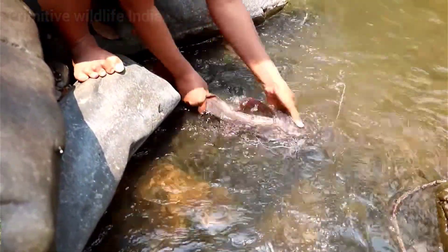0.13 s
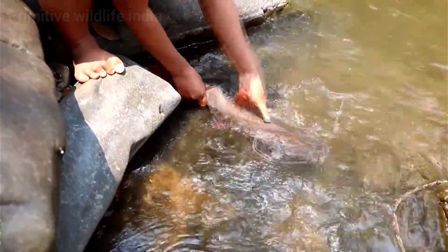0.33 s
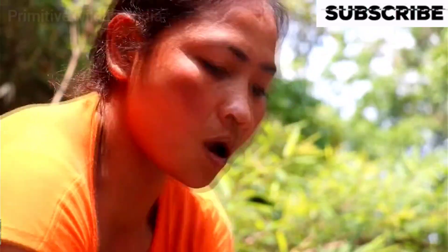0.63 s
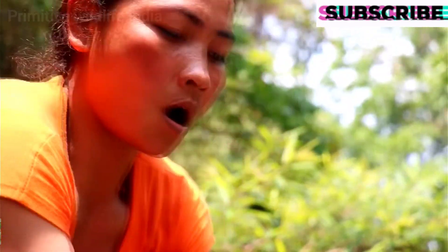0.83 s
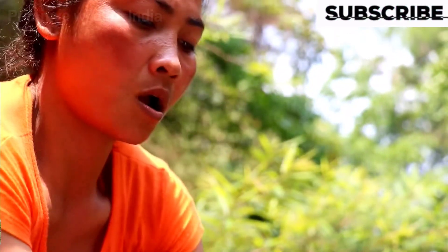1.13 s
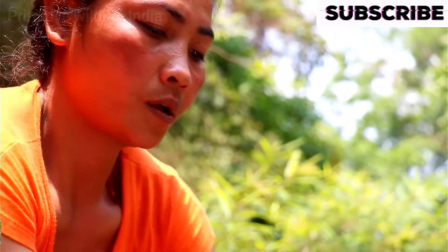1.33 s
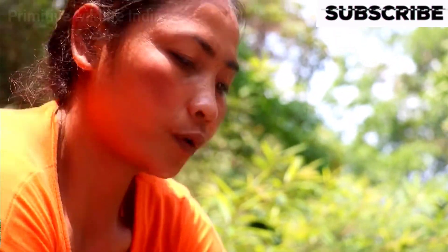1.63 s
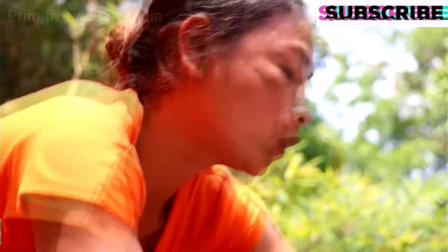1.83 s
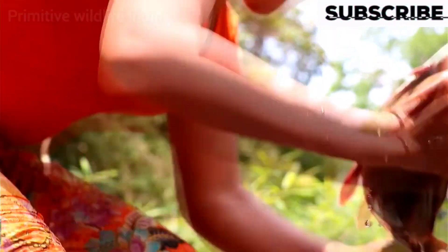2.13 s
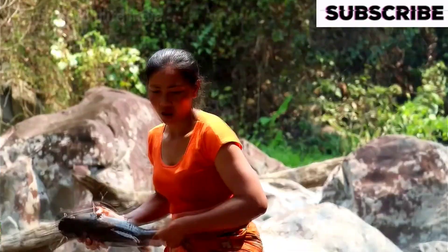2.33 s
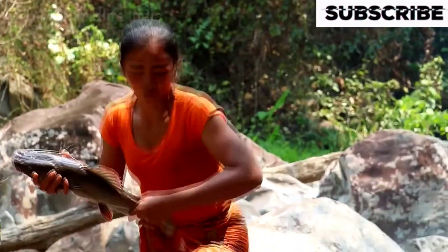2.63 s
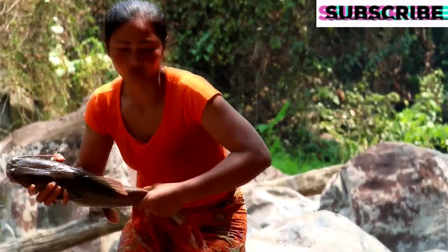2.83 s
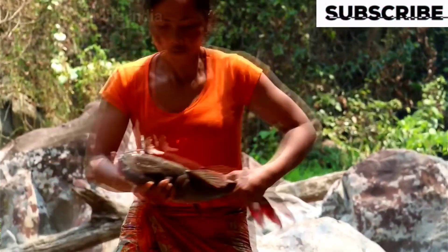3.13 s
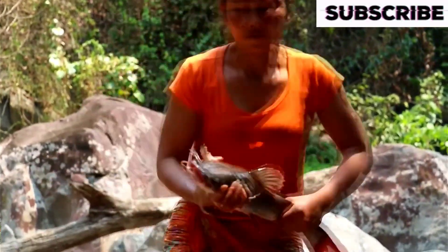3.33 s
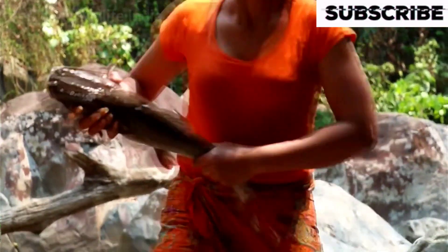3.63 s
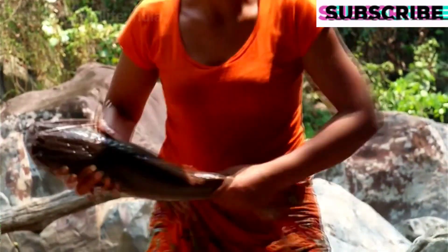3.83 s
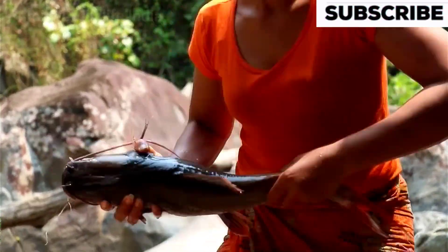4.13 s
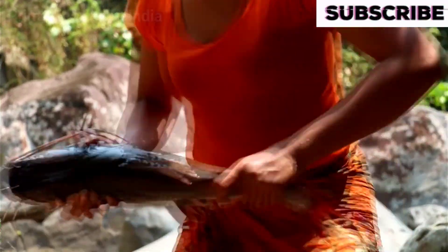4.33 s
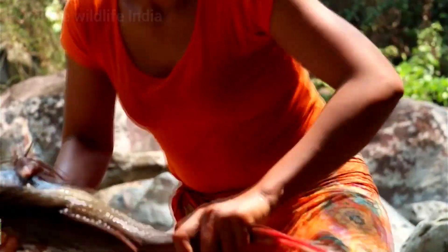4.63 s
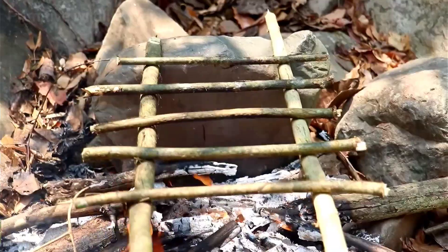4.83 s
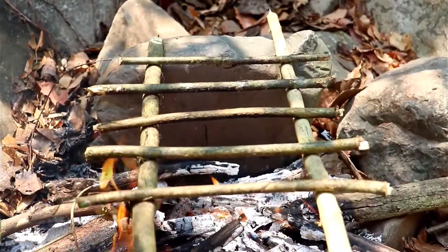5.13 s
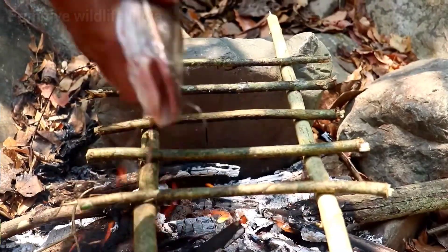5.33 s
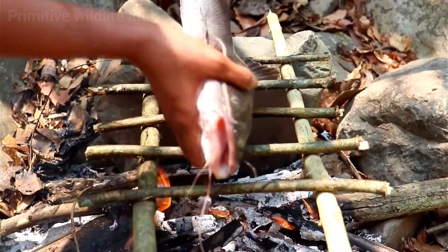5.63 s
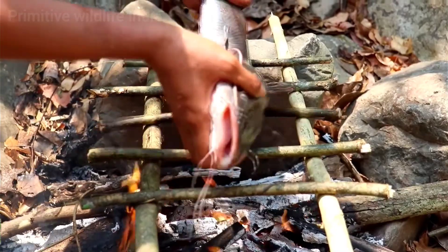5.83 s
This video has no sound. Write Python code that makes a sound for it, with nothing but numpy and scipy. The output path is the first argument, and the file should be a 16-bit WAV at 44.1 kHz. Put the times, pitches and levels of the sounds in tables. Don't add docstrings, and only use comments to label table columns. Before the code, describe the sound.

From 0 to 0.5 s, close shallow river water gurgles around hands rinsing a fish: low round bubbles, small high pings and a soft wash, swelling at the end. At 0.5 s it cuts abruptly to the water's edge, heard through a small, thin microphone ringing near 3 kHz. A grainy rush carries crowded sharp splashes, drips and spatters, with the loudest bursts near 1.0, 1.15 and 1.25 to 1.32 s, easing into small dull spatters by 2 s. From 2.1 s the rush is weaker, smoother and steady, with gentle swells. A knock comes at 2.7 s, a dry stone blow at 3.03 s briefly dips the water, and light knocks and rustles follow. After 4.55 s a similar thin hiss continues, swelling brightly around 5 s, with faint drips, a few ticks and soft rustles. Distant bird whistles and insect calls remain faint throughout.

```python
import sys
import numpy as np
from scipy import signal
from scipy.io import wavfile
from scipy.ndimage import uniform_filter1d

SR = 44100
rng = np.random.default_rng(int(sys.argv[2]) if len(sys.argv) > 2 else 0)


def amplitude_ratio(level_db):
    exponent = np.asarray(level_db, float) / 20
    return 10 ** exponent


def output_pcm(signal):
    pcm = np.clip(np.atleast_2d(signal).T, -1, 1) * 32767
    wavfile.write(sys.argv[1], SR, np.round(pcm).astype(np.int16))


N = 263277

# start_s, end_s
SHOTS = [
    (0, .479),
    (.502, 2.0635),
    (2.097, 4.506),
    (4.552, 6),
]

# frequency_hz, density_db
FOREST_COLOUR = [(20, 10.5), (45, 1), (90, -8), (200, -4.5), (400, -5), (1300, -0.5), (5000, -2.5),
                 (8500, -6), (11000, -22), (13000, -45)]
# start_s, length_s, from_hz, to_hz, level_db
BIRDS = [(0.052, 0.054, 4360, 5000, -40.5), (0.398, 0.19, 7340, 7240, -51), (1.998, 0.18, 8000, 8250, -57),
         (2.3, 0.2, 3550, 3600, -41), (3.036, 0.28, 4600, 4630, -47), (3.44, 0.18, 1297, 1190, -55),
         (4.88, .2, 4390, 4200, -40), (5.242, .06, 7200, 7060, -48), (5.395, .04, 6500, 7400, -46),
         (5.42, .22, 7500, 7400, -47), (5.7, 0.089, 7770, 7800, -42.5)]
# start_s, length_s,
# from_hz, to_hz, level_db
BLURRED_CALLS = [
    (0.19, 0.24, 7600, 4200, -38),
    (2.25, 0.26, 2850, 3336, -31.5),
    (4.87, .14, 2800, 2900, -34),
    (5.02, .16, 2950, 3200, -35),
    (4.88, .33, 6100, 5800, -45),
    (5.77, .08, 3200, 3600, -37.5),
    (5.761, 0.23, 4150, 3700, -42),
]

# time_s, level_db
RUSH = [(0.503, -26), (0.7, -28), (0.95, -31), (1.2, -29), (1.4, -29), (1.78, -34), (1.88, -33),
        (2.063, -31), (2.098, -36.5), (2.75, -36), (3.05, -37.5), (3.6, -36), (4.0, -36.5), (4.5, -36.5),
        (4.553, -39), (4.75, -35.5), (5.3, -37), (5.97, -36.5)]
# middle_s, half_width_s, rise_db, extra_treble_db_per_octave
SURGES = [
    (2.38, 0.068, 2, -1),
    (2.53, 0.074, 2.5, -2),
    (3.2, 0.041, 3.5, -0.5),
    (3.5, 0.044, 2.5, 0.7),
    (3.92, 0.1, 5.5, 1.5),
    (4.34, 0.035, 3.5, 0.5),
    (4.94, 0.067, 4.5, 2.1),
    (5.1, 0.13, 5, 1),
]
# frequency_hz, gain_db
SMALL_MIC = [(840, -30.5), (1400, -19.5), (1750, -12.5), (2000, -13), (2600, -3.5), (3080, 2), (3450, -3.5),
             (3850, -8.5), (4500, -10.5), (5300, -15), (6200, -15.5), (8200, -23.5), (9600, -20.5),
             (12500, -35.5)]

# time_s, level_db, brightness_db_per_octave
CLOSE = [
    (0.0, -31.5, 6.5),
    (0.132, -27.5, 2),
    (0.29, -30, 5.5),
    (0.478, -24, 4.5),
]
# frequency_hz, density_db
CLOSE_COLOUR = [(24, -53), (40, -47), (243, -6), (320, -20), (455, -1.5), (585, -9), (873, -4.5),
                (2570, -11), (3060, -6), (3560, -3.5), (5720, -20.5), (9690, -23.5), (16000, -40)]
# start_s, peak_db, pitch_hz, t60_s
GURGLES = [(0.038, -14, 464, 0.055), (0.062, -13, 690, 0.036), (0.094, -22, 827, 0.062),
           (0.131, -16.5, 885, 0.046), (0.147, -21.5, 860, 0.064), (0.205, -30, 440, 0.06),
           (0.11, -23, 1300, 0.03), (0.19, -24, 1450, 0.03), (0.251, -24.5, 1335, 0.081),
           (0.272, -21, 800, 0.03), (0.32, -24, 453, 0.13), (0.342, -18.5, 840, 0.064),
           (0.363, -15.5, 660, 0.046), (0.38, -22, 455, 0.089), (0.405, -24, 937, 0.039),
           (0.425, -13.5, 1110, 0.024), (0.444, -14.5, 369, 0.075)]
# start_s, peak_db, pitch_hz
PINGS = [
    (0.105, -28, 3600),
    (0.1595, -23, 4230),
    (0.19, -27, 4860),
    (0.2038, -22, 4600),
    (0.2563, -20, 4650),
    (0.288, -20, 2620),
    (0.302, -23, 4150),
    (0.343, -22.5, 2900),
    (0.45, -26, 4000),
]

# start_s, peak_db, treble_db, bass_db
SPLASHES = [(0.516, -12, -43, -21), (0.5643, -9.5, -17.5, -26), (0.605, -17, -18, -9),
            (0.651, -18, -25, -21), (0.676, -15.5, -14, -7), (0.756, -14, -28, -14.5),
            (0.839, -16, -37, -31), (0.875, -9.5, -33, -27), (0.9349, -8.5, -30, -41),
            (0.9764, -1, -21, -30), (1.0305, -14, -28, -33), (1.067, -18, -31, -15),
            (1.114, -15.5, -31, -18), (1.1562, -5.5, -16.5, -16.5), (1.2127, -12, -27, -27),
            (1.2417, -0.6, -21, -32), (1.289, -15, -19, -28), (1.301, -13, -1.5, -23),
            (1.3198, -4.5, -8, -28), (1.357, -10, -23, -39), (1.4383, -5, -20, -20),
            (1.4689, -13.5, -26, -25), (1.5086, -15, -25, -35), (1.522, -9.5, -20, -25),
            (1.541, -9, -28.5, -26), (1.6254, -18.5, -21, -11), (1.6796, -17, -27, -27),
            (1.8235, -29, -1, -34), (2.0565, -17, -24, -22)]
# start_s, peak_db
SPATTERS = [(0.5077, -22), (0.7717, -29), (1.1812, -18), (1.374, -21), (1.425, -19), (1.4942, -18),
            (1.582, -22.5), (1.709, -21), (1.86, -20.5), (1.934, -18), (1.949, -18), (1.978, -19.5),
            (1.989, -17.5), (2.0177, -22), (2.0385, -17.5)]
# start_s, peak_db, treble_db, t60_s
KNOCKS = [(2.3782, -36, -52, 0.035), (2.711, -15, -29, 0.074), (2.9665, -24.5, -24, 0.032),
          (3.0026, -16.5, -24, 0.045), (3.0324, -22, -28, 0.03), (3.086, -32, -4, 0.02),
          (3.197, -26, -25, 0.042), (3.3045, -27, -22, 0.018), (3.378, -28, -23, 0.029),
          (3.411, -29, -19, 0.034), (3.7637, -21, -41, 0.029), (3.7885, -23, -12, 0.052),
          (3.8714, -26, -7, 0.025), (4.038, -18.5, -19, 0.032), (4.4024, -23, -28, 0.061),
          (4.4333, -24, -22, 0.035), (4.806, -22.5, -28, 0.035), (5.524, -25.5, -24, 0.039),
          (5.766, -26, -24, 0.032)]
# start_s, peak_db, pitch_hz
DRIPS = [(.521, -27, 1490), (0.553, -31.5, 603), (.565, -29, 1520), (0.681, -45, 1600),
         (0.732, -29.5, 1670), (.828, -32.5, 1200), (.905, -38, 1100), (0.959, -40, 910), (.976, -23, 1830),
         (1.035, -27, 1800), (1.069, -33, 708), (1.124, -28, 1790), (1.192, -38, 940), (1.451, -34, 750),
         (1.485, -29, 1760), (1.633, -30, 1610), (1.661, -37, 1360), (2.005, -44, 790), (4.712, -38, 1780),
         (4.762, -41, 1750), (5.21, -38, 1900), (5.397, -39, 1790), (5.43, -37.5, 1750), (3.415, -48, 745),
         (3.428, -30, 5150), (3.419, -29, 3800)]
# start_s, peak_db, pitch_hz, t60_s, rise_octaves_per_s
CHIRPS = [
    (.572, -33, 695, 0.05, 35),
    (3.048, -27, 960, 0.015, 20),
    (.886, -39.5, 445, 0.096, 30),
    (1.323, -38.5, 353, 0.15, 56),
    (1.329, -23.5, 1230, 0.027, 60),
    (1.452, -30, 1106, 0.15, 62),
    (1.935, -40, 698, 0.33, 25),
    (2.05, -32.5, 1360, 0.06, 45),
]
# start_s, length_s, level_db, brightness_db_per_octave
RUSTLES = [
    (2.706, 0.03, -28, 3.5),
    (3.413, .04, -33, -4.5),
    (3.781, 0.047, -37, 6.5),
    (3.876, 0.084, -38.5, 6),
    (4.03, 0.072, -36, 2),
    (4.194, 0.014, -35, 8.5),
    (5.082, 0.047, -40, 5.5),
    (5.443, 0.18, -49, 10),
    (5.775, 0.078, -43, -2),
]
# start_s, peak_db, pitch_hz
THUMP = (3.0345, -14, 1000)

BOTTOM, TOP = (107, -56.5), (20000, -41.5)
FOREST_DB = -53
CALL_ENDS_DB = -9.5
BIRD_BLUR_HZ, WIDE_BLUR_HZ = 260, 470
EDGE_TILT, FAR_TILT = (1.7, 5.15), (2.48, 0.73)  # treble, bass in dB per octave at the usual level
EDGE_USUAL_DB, FAR_USUAL_DB = -29.5, -35.5
TREBLE_PER_DB, BASS_PER_SURGE_DB = -0.56, -2
GURGLE_RISE, PING_RISE, DRIP_RISE = 0.23, 0.099, 0.22
PING_T60_S, DRIP_T60_S, SPLASH_T60_S = 0.015, 0.063, 0.029
SPATTER_TREBLE_DB, SPATTER_BASS_DB, KNOCK_BASS_DB = -37, -28, -21
HARD_DB = -12
RING_HZ, RING_HZ_PER_DB, RING_SCATTER_HZ = 2916, 40.5, 126
SNAP_PER_DB, SHORTER_S_PER_DB = 0.23, 0.0008


def evened(x):
    return x / np.sqrt(np.mean(x ** 2) + 1e-20)


def read(points, hz):
    f, value = np.transpose(points)
    return np.interp(np.log(hz + 1), np.log(f + 1), value)


def curve(rows):
    s, *columns = np.transpose(rows)
    return [np.interp(np.arange(N) / SR, s, c) for c in columns]


def add(mix, s, sound):
    part = mix[round(s * SR):][:len(sound)]
    part += sound[:len(part)]


def causal(points, size=2048):
    gain_db = read(points, abs(np.fft.fftfreq(size, 1 / SR)))
    log_gain = np.log(amplitude_ratio(np.maximum(gain_db, -100)))
    spectrum = np.exp(np.conj(signal.hilbert(log_gain)))
    taps = np.fft.ifft(spectrum).real[:size // 2]
    return taps / np.linalg.norm(taps)


def hiss(colour, treble_db, bass_db, patchy_db, flicker_db, size=512):
    hop = size // 4
    frames, hz = N // hop + 5, np.fft.rfftfreq(size, 1 / SR)
    a, b, patches = rng.standard_normal((frames, len(hz), 3)).T
    patches = uniform_filter1d(patches, size=5, axis=0)
    patches = evened(uniform_filter1d(patches, size=6, axis=1))
    flicker = evened(uniform_filter1d(rng.standard_normal(frames), size=3))
    octaves = np.log2((hz + 200) / 3200)[:, None]
    at = np.minimum(np.arange(frames) * hop, N - 1)
    tilt = np.clip(octaves, 0, 1.6) * treble_db[at] + np.maximum(-octaves, 0) * bass_db[at]
    field_db = read(colour, hz)[:, None] + tilt + patchy_db[at] * patches + flicker_db * flicker
    field = (a + 1j * b) * amplitude_ratio(field_db)
    noise = signal.istft(field, nperseg=size, noverlap=size - hop)[1][:N]
    return noise / np.sqrt(np.median(uniform_filter1d(noise ** 2, size=2000)))


def bubble(hz, t60, rise):
    t = np.arange(0, abs(t60) + .002, 1 / SR)
    pitch_hz = np.minimum(hz * 2 ** (rise * t / t60), SR / 3)
    turns = np.cumsum(pitch_hz) / SR
    onset = 1 - np.exp(-t * hz / 0.28)
    return np.sin(2 * np.pi * turns) * amplitude_ratio(-60 * t / t60) * onset


def fizz(lo_hz, hi_hz, per_s, spread_db, cycles, count=24):
    strength = amplitude_ratio(spread_db * np.minimum(rng.exponential(1, N), 3.6))
    strength = strength * (rng.random(N) < per_s / SR)
    kind = rng.integers(0, count, N)
    shapes = [bubble(f, cycles / f, 0.46) for f in np.geomspace(lo_hz, hi_hz, count)]
    out = np.zeros(N)
    for at in np.flatnonzero(strength):
        add(out, at / SR, strength[at] * shapes[kind[at]])
    return out


def call(length, from_hz, to_hz, db, blur_hz):
    u = np.arange(0, length, 1 / SR) / length
    r = np.exp(-2 * np.pi * (blur_hz + 0.1 * abs(to_hz - from_hz)) / SR)
    noise = rng.standard_normal((20000, 2)) @ [1, 1j]
    smear = signal.lfilter([1], np.poly([r, r, r, r]), noise)
    smear = smear[2000:][:len(u)]
    turns = np.cumsum(from_hz + (to_hz - from_hz) * u) / SR
    tone = (smear * np.exp(2j * np.pi * turns)).real
    arch = amplitude_ratio(db + CALL_ENDS_DB * (2 * u - 1) ** 2)
    return arch * evened(tone) * signal.windows.tukey(len(u), .25)


def forest():
    flat = np.zeros(N)
    air = hiss(FOREST_COLOUR, flat, flat, patchy_db=flat + 1.1, flicker_db=-2.0, size=2048)
    out = amplitude_ratio(FOREST_DB) * air
    for calls, blur_hz in [(BIRDS, BIRD_BLUR_HZ), (BLURRED_CALLS, WIDE_BLUR_HZ)]:
        for s, *row in calls:
            add(out, s, call(*row, blur_hz))
    return out


def trickle():
    return amplitude_ratio(-57.5) * evened(fizz(620, 2200, 110, 2.6, 28.0))


def rush():
    t = np.arange(N) / SR
    edge = t < SHOTS[1][1]
    surge_db, spray_db = sum(np.c_[tilts] * np.exp(-((t - s) / half) ** 2) for s, half, *tilts in SURGES)
    level_db = curve(RUSH)[0] + surge_db
    treble_db, bass_db = np.where(edge, np.c_[[*EDGE_TILT]], np.c_[[*FAR_TILT]])
    excess_db = level_db - np.where(edge, EDGE_USUAL_DB, FAR_USUAL_DB)
    treble_db = treble_db + spray_db + TREBLE_PER_DB * excess_db
    bass_db = bass_db + BASS_PER_SURGE_DB * surge_db
    crowd = signal.lfilter([1, -.9], [1], fizz(712, 8720, 700, 3.8, 19.))
    grains = signal.oaconvolve(crowd, causal(SMALL_MIC + [TOP]))[:N]
    share = np.where(edge, amplitude_ratio(.5), amplitude_ratio(-11))
    patchy_db = np.where(edge, 3, 1.3)
    wash = hiss([BOTTOM] + SMALL_MIC + [TOP], treble_db, bass_db, patchy_db, flicker_db=.7)
    return amplitude_ratio(level_db) * (wash + share * evened(grains)) / np.sqrt(1 + share ** 2)


def close_water():
    level_db, bright_db = curve(CLOSE)
    wash = hiss(CLOSE_COLOUR, bright_db, bright_db, patchy_db=np.full(N, 3.5), flicker_db=2.0)
    coarse_fizz = evened(fizz(650, 2300, 350, 3.2, 15.))
    fine_fizz = evened(fizz(1830, 10900, 500, 2.6, 27.0))
    out = amplitude_ratio(level_db) * (amplitude_ratio(-6) * wash + amplitude_ratio(-5) * coarse_fizz + amplitude_ratio(-14) * fine_fizz)
    for s, db, hz, t60 in GURGLES:
        add(out, s, amplitude_ratio(db) * bubble(hz, t60, GURGLE_RISE))
    for s, db, hz in PINGS:
        add(out, s, amplitude_ratio(db) * bubble(hz, PING_T60_S, PING_RISE))
    return out


def rustle(length, bright_db):
    count = round(length * SR)
    noise, grip = rng.standard_normal((9000, 2)).T
    crackle = noise * amplitude_ratio(1.9 * evened(uniform_filter1d(grip, size=40)))
    envelope = signal.windows.tukey(count, .4) * np.linspace(1, .45, count)
    colour = [(f, db + bright_db * max(np.log2(f / 3000), 0)) for f, db in SMALL_MIC + [TOP]]
    return evened(signal.oaconvolve(crackle[:count] * envelope, causal(colour, size=512)))


def thump(hz):
    out = np.zeros(4000)
    add(out, 0, 0.99 * bubble(hz, 0.0078, -.3))
    add(out, 0, -0.96 * bubble(2.02 * hz, 0.005, -.1))
    add(out, 0, 1.5 * bubble(3140, 0.0053, -0.12))
    add(out, 0, 0.23 * bubble(1.28 * hz, 0.029, 0.06))
    return out


def ring_hz(db):
    scatter_hz = RING_SCATTER_HZ * rng.uniform(-0.37, 1)
    return RING_HZ + RING_HZ_PER_DB * max(db - HARD_DB, 0) + scatter_hz


def splash(treble_db, bass_db, t60, hz, snap):
    t = np.arange(2600) / SR
    noise, clumps = rng.standard_normal((len(t), 2)).T
    clumps = amplitude_ratio(3 * evened(uniform_filter1d(clumps, size=60)))
    packet = snap * np.exp(-t / 0.00026) * (np.sin(2 * np.pi * hz * t) + .5 * noise)
    droplets = noise * clumps * amplitude_ratio(-60 * t / t60)
    drive = (packet + droplets) * (1 - np.exp(-t / 0.0007))
    colour = [(500, bass_db - 25.0), (1200, bass_db - 12), (1900, bass_db),
              (0.84 * hz, -16), (hz, 0), (1.114 * hz, -16),
              (5800, treble_db), (9000, treble_db - 16.5), (16000, treble_db - 23.5)]
    sound = signal.oaconvolve(drive, causal(colour, size=1024))
    return sound / abs(sound).max()


def hands():
    out = np.zeros(N)
    small = [(s, db, SPATTER_TREBLE_DB, SPATTER_BASS_DB) for s, db in SPATTERS]
    for s, db, treble_db, bass_db in SPLASHES + small:
        hard_db = max(db - HARD_DB, 0)
        t60 = SPLASH_T60_S - SHORTER_S_PER_DB * hard_db
        snap = 0.5 + SNAP_PER_DB * hard_db
        add(out, s, amplitude_ratio(db) * splash(treble_db, bass_db, t60, ring_hz(db), snap))
    for s, db, treble_db, t60 in KNOCKS:
        add(out, s, amplitude_ratio(db) * splash(treble_db, KNOCK_BASS_DB, t60, ring_hz(db), snap=0.49))
    for s, db, hz in DRIPS:
        add(out, s, amplitude_ratio(db) * bubble(hz, DRIP_T60_S, DRIP_RISE))
    for s, db, hz, t60, octaves_per_s in CHIRPS:
        add(out, s, amplitude_ratio(db) * bubble(hz, t60, octaves_per_s * t60))
    for s, length, db, bright_db in RUSTLES:
        add(out, s, amplitude_ratio(db) * rustle(length, bright_db))
    s, db, hz = THUMP
    add(out, s, amplitude_ratio(db) * thump(hz))
    no_bass = signal.butter(2, 330, "high", fs=SR, output="sos")
    return signal.sosfilt(no_bass, out)


def scene():
    t = np.arange(N) / SR
    close, *later = [uniform_filter1d(1. * (t >= a) * (t < b), size=40) for a, b in SHOTS]
    since = t - THUMP[0]
    duck = amplitude_ratio(-7 * (since > 0) * np.exp(-abs(since / 0.049) ** 3))
    river = close * close_water() + sum(later) * (duck * rush() + hands())
    return (river + forest() + later[0] * trickle())[None]


def top_cut(x):
    return signal.sosfilt(signal.butter(12, 16640, fs=SR, output="sos"), x)


def record(dry):
    edge = signal.firwin(511, 15950, window=("kaiser", 6), fs=SR)
    mix = signal.oaconvolve(dry, edge[None], "same")
    return top_cut(mix)


dry = scene()
out = record(dry)
output_pcm(out)
```